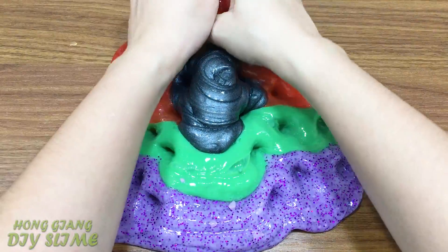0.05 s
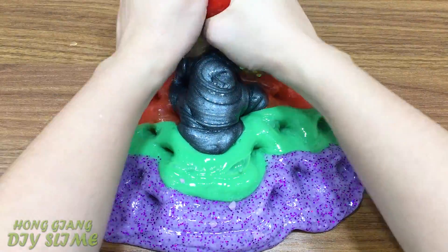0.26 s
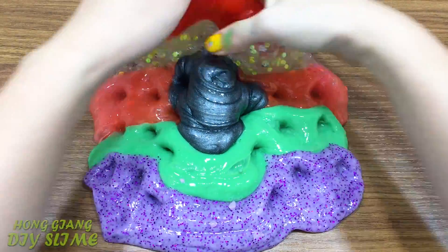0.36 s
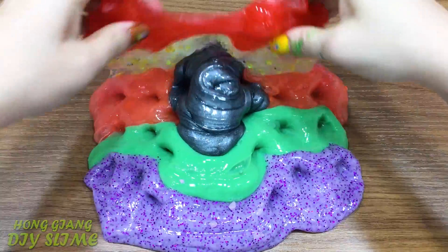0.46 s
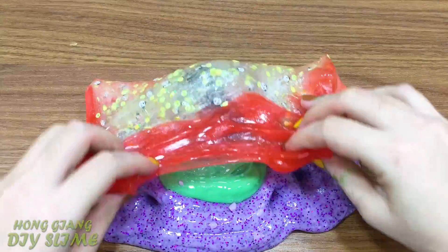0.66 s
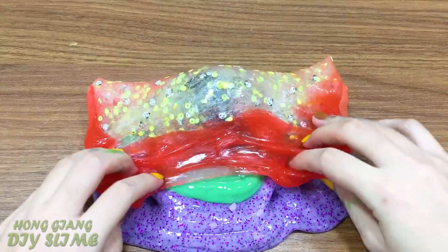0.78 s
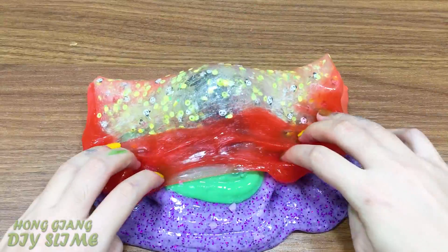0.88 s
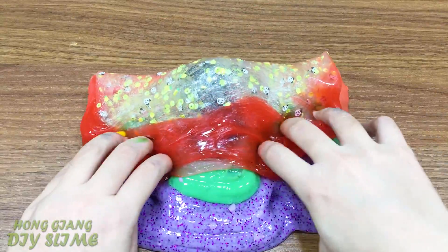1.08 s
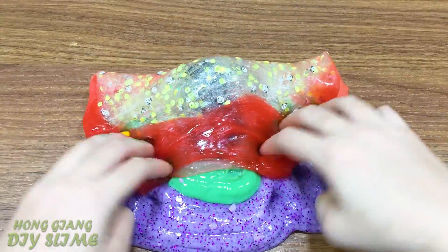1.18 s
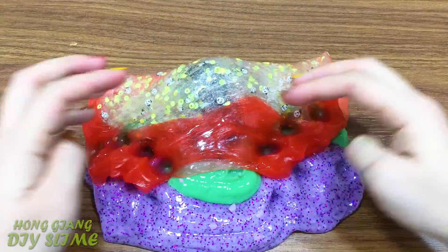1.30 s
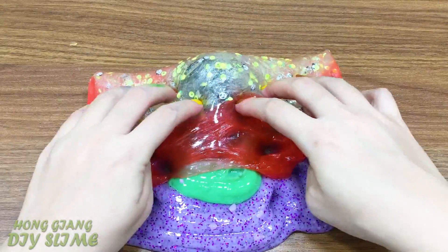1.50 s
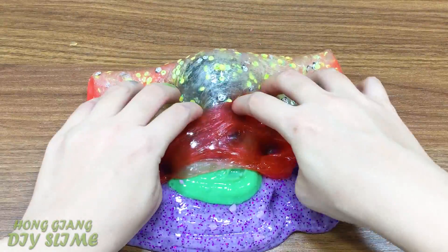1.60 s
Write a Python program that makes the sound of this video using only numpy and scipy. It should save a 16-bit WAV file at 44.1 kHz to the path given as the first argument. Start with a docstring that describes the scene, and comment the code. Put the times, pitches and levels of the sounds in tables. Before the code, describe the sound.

Slime bubbles pop and crackle sharply under squeezing fingers on a table in an echoing room.

```python
"""Slime pressed on a table

Fingers fold and press glossy slime on a wooden table, close to a microphone in a bare, echoing room.
Air bubbles snap and swarms of tiny ones crackle, all as short damped wavelets; longer ones make
the plops and sucking gulps. Early echoes and shaped noise answer for table and walls, over room noise
and the fading tail of an earlier squeeze."""
import sys
import numpy as np
from scipy import signal
from scipy.fft import rfft, irfft, next_fast_len
from scipy.io import wavfile
from scipy.ndimage import map_coordinates

SR = 44100
rng = np.random.default_rng(int(sys.argv[2]) if len(sys.argv) > 2 else 0)


def master_out(mix):
    """Clip the mix to full scale and print it as 16-bit PCM to the path in sys.argv[1]."""
    frames = np.transpose(np.atleast_2d(mix))
    ceiling = np.clip(frames, -1, 1)
    pcm = np.round(ceiling * 32767).astype(np.int16)
    wavfile.write(sys.argv[1], SR, pcm)


def decibels_to_gain(level_db):
    """Convert a level in decibels to a linear amplitude gain (20 dB per decade)."""
    exponent = np.asarray(level_db, float) / 20
    return 10 ** exponent


N = 72765  # samples, 1.65 s


def along(points, hz):
    """Reads a curve of (f/Hz, value) points on a log frequency axis."""
    f, value = np.transpose(points)
    return np.interp(np.log(hz + 1), np.log(f + 1), value)


def unit(x):
    """Scales x to rms 1."""
    return x / np.sqrt(np.mean(x ** 2) + 1e-20)


def coloured(x, points):
    """Filters x by a curve of (f/Hz, gain/dB) points."""
    size = next_fast_len(len(x) + SR // 4)
    gain = decibels_to_gain(along(points, np.fft.rfftfreq(size, 1 / SR)))
    return irfft(rfft(x, size) * gain, size)[:len(x)]


def blips(s, db, hz, cycles, size):
    """Damped wavelets starting at s seconds; one hears the change of air flow, so they carry little bass."""
    s, db, hz, cycles = (np.asarray(v, float)[:, None] for v in (s, db, hz, cycles))
    at = np.floor(s * SR).astype(int) + np.arange(size)
    turns = np.maximum(at / SR - s, 0) * hz  # cycles since the start
    decay = np.exp(-2 * turns / np.maximum(cycles, .5))
    onset = (1 - np.exp(-6 * turns)) ** 2
    flow = decibels_to_gain(db) * 2.2 * np.sin(2 * np.pi * turns) * decay * onset
    # the divisor undoes the gain of the difference at the wavelet's own pitch
    wave = np.diff(flow, axis=1, prepend=0) / (2 * np.sin(np.pi * hz / SR))
    return np.bincount(at.ravel(), wave.ravel(), N + SR)[:N]


def pops():
    """Each bubble snaps, spits briefly (fine ones more) and leaves a hollow that draws air back, mostly lower."""
    # bursting bubbles: [t/s, snap peak level/dB, snap f/Hz, hollow peak level/dB]
    bubbles = [(0.1107, -44, 5500, -65), (0.2475, -11, 7950, -19.5), (0.2516, -19, 9900, -27.5),
               (0.262, -20, 10200, -26), (0.272, -23, 11100, -35), (0.286, -10, 7360, -17.5),
               (0.2898, -25, 9900, -28), (0.3009, -7, 12300, -16), (0.3029, -10, 12200, -44),
               (0.308, -22, 12500, -17), (0.3144, -12, 13000, -39.5), (0.3226, -22, 8100, -32),
               (0.3357, -15.5, 7750, -29.5), (0.34, -23, 8000, -13), (0.3412, -16, 4000, -54),
               (0.3448, -12, 12000, -31.5), (0.3578, -12.5, 7400, -21), (0.364, -16.5, 7700, -38),
               (0.365, -19.5, 4000, -47), (0.8607, -44, 5700, -61), (0.906, -47, 7200, -56),
               (0.9373, -52.5, 4530, -54.5), (0.9437, -50, 4200, -66), (1.1355, -24, 7000, -31.5),
               (1.288, -42.5, 1690, -50.5), (1.3255, -49, 9500, -64), (1.345, -45, 13000, -56),
               (1.3529, -26.5, 13000, -41), (1.363, -34, 8500, -50), (1.366, -19.5, 8300, -31),
               (1.3718, -19, 11000, -35), (1.3744, -27, 12600, -42), (1.3772, -18.5, 7240, -21.5),
               (1.3796, -13, 3930, -25), (1.5057, -32.5, 6050, -37), (1.6172, -47.5, 8000, -53)]
    s, db, hz, hollow_db = np.transpose(bubbles)

    snap_s, least_cycles = 0.00024, 1.5  # decay length, but never fewer cycles than this
    snaps = blips(s, db, hz, np.maximum(hz * snap_s, least_cycles), size=128)

    hollow_hz, hollow_cycles = 2200, 1.1
    hollows = blips(s, hollow_db, hollow_hz + 0 * s, hollow_cycles + 0 * s, size=256)

    # 12 droplets per bubble, the later the softer
    spit_db, fine_db_per_octave, spit_s = -14, 9, .0008  # level against the snap, extra above 6 kHz, time scale
    lateness, detune, ringing = rng.random((3, len(s), 12))
    droplet_s = s[:, None] + spit_s * (.5 + 2 * lateness)
    fine_db = fine_db_per_octave * np.log2(hz / 6000).clip(0)
    droplet_db = (db + spit_db + fine_db)[:, None] - 10 * lateness
    droplet_hz = np.minimum(hz[:, None] * 2 ** (1.2 * detune - .6), SR / 2.8)
    droplets = (droplet_s, droplet_db, droplet_hz, 1 + ringing)
    spit = blips(*(v.ravel() for v in droplets), size=128)
    return snaps - hollows + spit  # the hollow pulls air the other way


def plops():
    """Air pockets collapse and fingers press: mostly low, soft wavelets."""
    # collapses and presses: [t/s, peak level/dB, f/Hz, decay/cycles]
    pockets = [(0.245, -18.5, 4620, 5.5), (0.2485, -26.5, 624, 0.54), (0.61, -43, 910, 0.94),
               (1.1363, -44.5, 770, 0.74), (1.2845, -51.5, 790, 2.3), (1.2865, -55.5, 380, 2.9),
               (1.38, -23, 1020, 1.24), (1.381, -22.5, 487, 0.62), (1.384, -59, 55, 3.4)]
    return blips(*np.transpose(pockets), size=6000)


def bubbling(level, per_s, pitch, octaves, cycles, count, size):
    """Wavelets at random times, pitches and strengths, under curves of level (t/s, dB) and pitch (t/s, Hz)."""
    gap, strength, ringing = rng.random((3, count))
    s = np.cumsum(-np.log(gap + 1e-9)) / per_s
    s = np.minimum(s, N / SR)  # late ones fall past the end
    hz = np.interp(s, *np.transpose(pitch)) * 2 ** (octaves * rng.standard_normal(count))
    hz = np.clip(hz, 230, SR / 2.7)
    db = -2 * np.log(strength + 1e-2)  # few strong, many weak
    grains = blips(s, db, hz, cycles * (.5 + ringing), size)
    return unit(grains) * decibels_to_gain(np.interp(np.arange(N) / SR, *np.transpose(level)))


def swarm():
    """Countless tiny bubbles crackle, louder as the slime is pulled harder."""
    # loudness of the crackle: [t/s, level/dB]
    crackle = [(.244, -71.5), (.25, -71), (.295, -81), (.305, -33), (.314, -26.5), (.345, -23.5),
               (0.377, -29), (.42, -41), (.52, -48), (.62, -55), (.905, -101), (.92, -65.5), (0.946, -71),
               (0.956, -86), (1.31, -77), (1.347, -59.5), (1.356, -44.5), (1.38, -41), (1.395, -72),
               (1.45, -101)]
    # centre pitch, as stretching frees finer bubbles than pressing: [t/s, f/Hz]
    fineness_curve = [(.36, 12970), (0.431, 6100), (.9, 12000), (1.345, 12000), (1.355, 5500)]
    return bubbling(crackle, 8000, fineness_curve, octaves=.45, cycles=3, count=14000, size=96)


def sucking():
    """Slime sucks off the table and the fingers in low gulps: sparser, longer wavelets."""
    # loudness of the gulps: [t/s, level/dB]
    gulps = [(.24, -83), (.27, -63), (.36, -57), (.515, -59.5), (.55, -71), (.7, -93), (1.345, -74),
             (1.352, -45), (1.375, -45), (1.385, -41.5), (1.41, -59), (1.45, -90)]
    # centre pitch of the gulps: [t/s, f/Hz]
    gulp_pitch = [(1.0, 402), (1.3, 950)]
    return bubbling(gulps, 500, gulp_pitch, octaves=.45, cycles=2, count=900, size=1500)


def room(x):
    """Early echoes off table and wall, and a noise tail that swells and dies at its own rate in each band."""
    # early echoes, two off the table, then one off a wall: [delay/s, level/dB]
    echoes = [(.00075, -26), (.00165, -16.5), (.008, -18.5)]
    # reverberation time, the fall by 60 dB: [f/Hz, T60/s]
    reverb_time = [(360, 0.59), (1400, 0.91), (3700, 0.72), (9700, 0.72), (15000, 0.47)]
    # tone of the tail: [f/Hz, gain/dB]
    tail_colour = [(150, -10.5), (360, 1.5), (1000, 4.5), (3200, -4.5), (6000, -8), (10000, -8.5),
                   (16000, -1)]
    tail_db, gap_s, rise_s = -2, .0025, .007  # tail level before its colour, silence ahead of it, swell time

    hz, t, bands = signal.stft(rng.standard_normal(N), SR, nperseg=256)
    fall = decibels_to_gain(-60 * t / along(reverb_time, hz)[:, None])
    tail = signal.istft(bands * fall, SR, nperseg=256)[1][:N]
    t = np.arange(N) / SR
    tail = tail * (1 - np.exp(-np.maximum(t - gap_s, 0) / rise_s))
    answer = coloured(decibels_to_gain(tail_db) * tail / np.linalg.norm(tail), tail_colour)
    for delay, db in echoes:
        answer[round(delay * SR)] += decibels_to_gain(db)
    return signal.fftconvolve(x, answer)[:N]


def earlier_squeeze():
    """An earlier squeeze still dying in the room: coloured noise under a steady fall in dB."""
    # tone of the old tail: [f/Hz, relative level per Hz/dB]
    old_colour = [(120, -33.5), (200, -12), (933, -14.5), (2170, -12), (16000, -30.5)]
    start_db, t60_s = -59, 1.45
    t = np.arange(N) / SR
    return unit(coloured(rng.standard_normal(N), old_colour)) * decibels_to_gain(start_db - 60 * t / t60_s)


def room_air():
    """Quiet hum and hiss of the room: coloured noise whose level wavers a little."""
    # tone of the room air: [f/Hz, relative level per Hz/dB]
    air_colour = [(25, -19), (55, -1), (110, -1.5), (250, -11), (400, -8.5), (700, -21.5), (3700, -24.5),
                  (15000, -31.5)]
    air_db, waver_db = -66, .8
    t = np.arange(N) / SR
    waver = map_coordinates(rng.standard_normal(24), [t * 12])  # 12 random points a second, smoothly joined
    return unit(coloured(rng.standard_normal(N), air_colour)) * decibels_to_gain(air_db + waver_db * waver)


def scene():
    """Slime sounds, their room and the background, in mono."""
    slime = pops() + plops() + swarm() + sucking()
    return (slime + room(slime) + earlier_squeeze() + room_air())[None]


def low_pass(x):
    """Removes everything above the highest recorded frequency."""
    return signal.sosfilt(signal.butter(12, 16970, fs=SR, output="sos"), x)


def record(dry):
    """The microphone's band: a gentle low cut and a steep treble limit."""
    low_cut = signal.butter(2, 40, "high", fs=SR, output="sos")
    top_cut = signal.cheby2(10, 40, 16450, fs=SR, output="sos")  # 40 dB down from 16450 Hz
    mix = signal.sosfilt(np.vstack([low_cut, top_cut]), dry)
    return low_pass(mix)


dry = scene()
out = record(dry)
master_out(out)
```